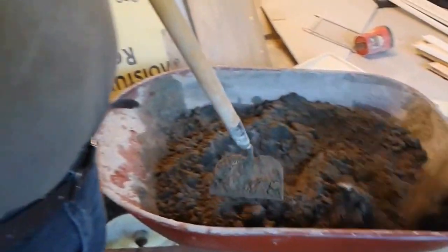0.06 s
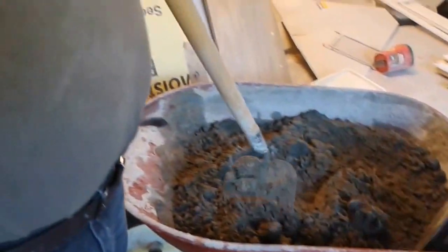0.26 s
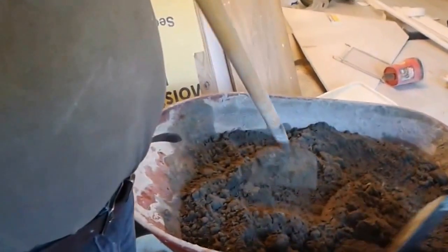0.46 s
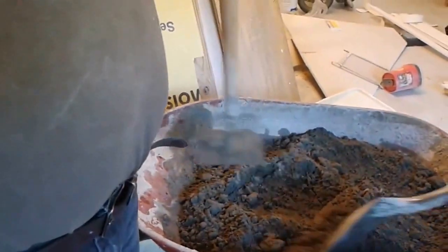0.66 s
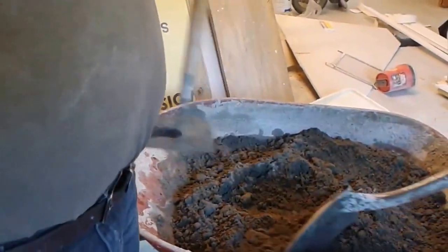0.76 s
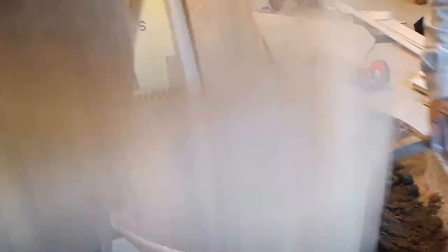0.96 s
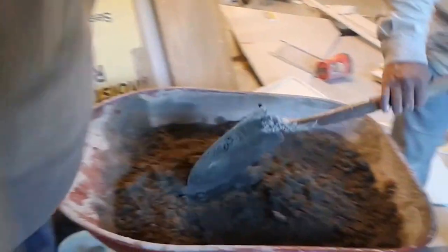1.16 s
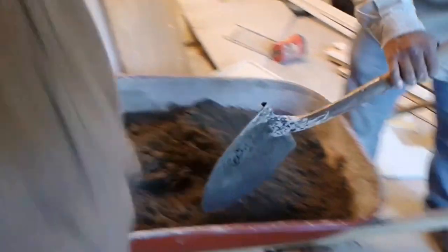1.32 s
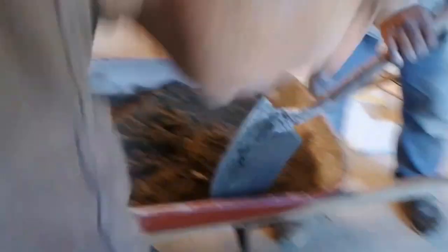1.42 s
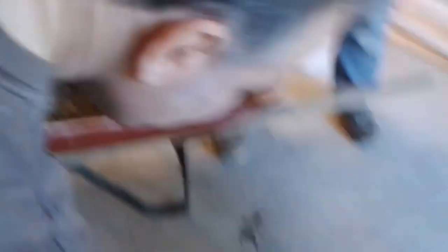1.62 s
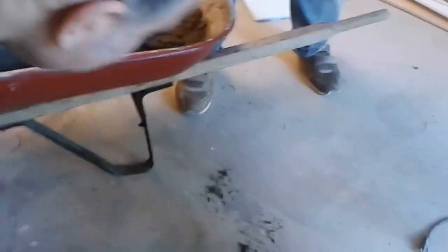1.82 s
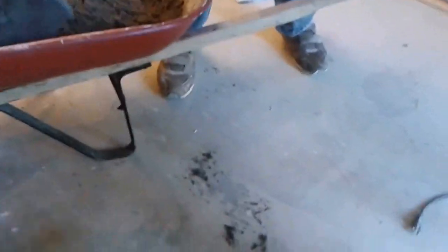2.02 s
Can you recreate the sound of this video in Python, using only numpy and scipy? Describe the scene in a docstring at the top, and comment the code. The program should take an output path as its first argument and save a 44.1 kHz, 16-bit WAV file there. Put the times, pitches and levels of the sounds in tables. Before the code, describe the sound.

A hoe crunches into damp sand and cement in a steel wheelbarrow and drags with a long gritty scrape; loose grains slide, then a shovel knocks and ploughs through. Close stereo pickup in a bare, dully echoing room.

```python
"""Mixing sand and cement in a barrow

Damp sand and cement are turned in a steel wheelbarrow in a bare concrete room, over a low rumble.
Loose mix slides before and after a hoe bites and drags; then a shovel knocks the tray and ploughs.
Grit is grainy noise that hisses and sets the decaying modes of blade and tray ringing;
knocks add short bursts and struck modes, and dull reverberation surrounds it all."""
import sys
import numpy as np
from scipy import signal
from scipy.fft import rfft, irfft, next_fast_len
from scipy.io import wavfile

SR = 44100
rng = np.random.default_rng(int(sys.argv[2]) if len(sys.argv) > 2 else 0)


def int16_out(signal):
    """Quantize to a 16-bit WAV file."""
    q = np.round(np.clip(np.atleast_2d(signal).T, -1, 1) * 32767)
    wavfile.write(sys.argv[1], SR, q.astype(np.int16))


def voltage_ratio(decibels):
    """Convert decibels (scalar or array-like) to amplitude ratios, 20 dB per decade."""
    exponent = np.asarray(decibels, float) / 20
    return 10 ** exponent


N = 91904  # length in samples


def rms_one(x):
    """Scale to unit rms."""
    return x / np.sqrt(np.mean(x ** 2) + 1e-20)


def in_time(rows):
    """Join the columns by lines over time; the first level is silent outside the table."""
    s, db, *rest = np.transpose(rows)
    t = np.arange(N) / SR
    level_db = np.interp(t, s, db, left=-150, right=-150)
    return [level_db] + [np.interp(t, s, column) for column in rest]


def at_hz(points, hz):
    """Read a table on a log-frequency axis."""
    table_hz, value = np.array(points).T
    return np.interp(np.log(hz), np.log(table_hz), value)


def drift(rate_hz):
    """Slow random wander of spread 1: noise through two equal poles, drawn at every 20th sample."""
    pole = np.exp(-40 * np.pi * rate_hz / SR)
    noise = rng.standard_normal((N + SR) // 20 + 2)
    slow = signal.lfilter([1], [1, -2 * pole, pole * pole], noise)[SR // 20:]  # skip the first second
    return np.interp(np.arange(N) / 20, np.arange(len(slow)), rms_one(slow))


def colour(pair, spectrum):
    """Shape a noise by a spectrum, then bring it to unit rms."""
    hz = np.maximum(np.arange(N // 2 + 1) * SR / N, 1)
    return rms_one(irfft(rfft(pair) * voltage_ratio(at_hz(spectrum, hz)), N))


def crunch(lumpy_db):
    """Crushed grit: two noises (middle, side) share the same random grains and slower lumps."""
    grains_per_s, grain_s = 2200, 0.0017  # grain power falls to 1/e in grain_s
    starts = rng.random(N) < grains_per_s / SR
    floor = 0.084  # some hiss stays between grains
    grain_power = signal.lfilter([1], [1, -np.exp(-1 / (grain_s * SR))], starts + floor)
    lumps = voltage_ratio(lumpy_db * (drift(39.0) + 0.5 * drift(166)))
    return rms_one(rng.standard_normal((2, N)) * np.sqrt(grain_power) * lumps)


def ring(force, modes, loaded=False):
    """A force, or a fresh one per mode, rings decaying modes; a load makes pitch and strength wander."""
    wander, swell_db, rate_hz = .01, 2.2, 6.0  # wet mix loads the steel unevenly: share of pitch, dB
    out = 0
    for k, (hz, db, t60) in enumerate(modes):
        push = force() if callable(force) else force
        bend, swell = (drift(rate_hz), drift(rate_hz)) if loaded else (np.zeros(N), 0)
        turn = np.exp(2j * np.pi * hz * np.cumsum(1 + wander * bend) / SR)
        # Shift the mode down to 0 Hz, let it decay there, and shift it back
        shifted = (push + 1e-18) * voltage_ratio(swell_db * swell) / turn
        decay = voltage_ratio(-60 / (np.clip(t60, .01, 3) * SR))
        held = signal.lfilter([1], [1, -decay], shifted)
        out = out + (-1) ** k * voltage_ratio(db) * (held * turn).imag
    return out


# Rumble spectrum. Each row: frequency in Hz, relative level in dB.
AIR_SPECTRUM = [(25, -26), (70, -9.5), (140, -6.5), (220, -13), (400, -20.5), (1400, -30), (9000, -34),
                (14500, -36.5)]
# Loudness of the rumble before its waver. Each row: time in seconds, level in dB.
AIR_LEVEL = [(0, -49.5), (1.0, -54.5), (1.75, -49.5), (1.9, -76), (2.1, -70)]


def rumble():
    """The room's rumble: bass-heavy noise with a wavering level."""
    waver_db = 2.0 * drift(25)
    level_db = in_time(AIR_LEVEL)[0] + waver_db
    return voltage_ratio(level_db) * colour(rng.standard_normal((2, N)), AIR_SPECTRUM)


# Two spells of loose mix sliding, one list each. Each row: time in seconds, level in dB.
SLIDES = [
    [(0, -47), (.12, -55), (.14, -49.5), (.3, -56.5), (.325, -43), (.34, -51)],
    [(1.0, -62), (1.04, -50), (1.048, -43), (1.07, -56.5), (1.16, -55), (1.168, -39), (1.19, -36),
     (1.225, -42.5), (1.26, -48.5), (1.37, -51.5), (1.4, -36), (1.43, -35), (1.515, -38)],
]
# Spectrum of fine sand on steel. Each row: frequency in Hz, relative level in dB.
SAND_SPECTRUM = [(150, -23), (300, -7), (1300, -10.5), (1800, -10), (2400, -6), (4200, -8), (5600, -0.5),
                 (7500, -8), (10000, -21), (14500, -28)]


def sliding_mix():
    """Fine sand slipping on steel: coloured grain noise following the two spells of sliding."""
    fine = crunch(lumpy_db=.6)
    level = sum(voltage_ratio(in_time(rows)[0]) for rows in SLIDES)
    return level * colour(fine, SAND_SPECTRUM)


def squeak():
    """A short, faint, rough whistle: noise rings one mode under a bell-shaped level."""
    middle_s, length_s, hz, peak_db = .135, .03, 3100, -56
    shape_db = peak_db - 10 * ((np.arange(N) / SR - middle_s) / length_s) ** 2
    whistle = rms_one(ring(rng.standard_normal((2, N)), [(hz, 0, .06)]))
    return voltage_ratio(np.maximum(shape_db, -200)) * whistle


def patchy(pair):
    """Grains of one size come in surges: each third of an octave swells and sinks on its own."""
    swell_db, rate_hz = 2, 6.5
    whole = rfft(pair)
    hz = np.clip(np.arange(N // 2 + 1) * SR / N, 500, 14000)
    place = 3 * np.log2(hz / 500)  # in thirds of an octave
    out = 0
    for k in range(16):
        band = irfft(whole * np.sqrt(np.clip(1 - abs(place - k), 0, 1)), N)
        out = out + voltage_ratio(swell_db * drift(rate_hz)) * band
    return rms_one(out)


def dulled(pair, grit_db):
    """Light contact is duller: the top of the hiss sinks faster than the rest."""
    treble_hz, follows = 8700, 0.35  # treble dB lost per dB under the loudest grit
    body = signal.sosfiltfilt(signal.butter(2, treble_hz, fs=SR, output="sos"), pair)
    return body + (pair - body) * voltage_ratio(follows * (grit_db - grit_db.max()))


def rubbed(level_db, modes):
    """Steel driven by rubbing grit: its loaded modes, scaled by the power they would gather."""
    force = crunch(lumpy_db=3.5)
    power = sum(voltage_ratio(2 * db) * t60 * SR / (4 * np.log(1000)) for hz, db, t60 in modes)
    return ring(force * voltage_ratio(level_db), modes, loaded=True) / np.sqrt(power)


# Modes of the steel tray. Each row: frequency in Hz, relative strength in dB, 60 dB decay in seconds.
TRAY = [(112, -12, .08), (139, -7, .1), (169, 0, .12), (197, -5, .1), (240, -10, .06), (436, -5, .03)]


def knocks(rows, blade, crushed):
    """Each knock: a burst of crushed grit, struck blade modes of uneven strength, a push on the tray."""
    s, crack_db, ring_db, boom_db = np.transpose(rows)

    def clicks(level_db, spread_db):
        """One-sample pushes at the knock times, with fresh strengths for middle and side."""
        train = np.zeros((2, N))
        uneven_db = spread_db * rng.standard_normal((len(s), 2)).T
        train[:, (s * SR).astype(int)] = voltage_ratio(level_db + uneven_db)
        return train

    # The burst rises in about 1 ms and dies away with a 5 ms time constant
    fall, rise = np.exp(-1 / (.005 * SR)), np.exp(-1 / (.001 * SR))
    dying = signal.lfilter([1], [1, -fall], clicks(crack_db, 0)[0])
    envelope = signal.lfilter([1 - rise], [1, -rise], dying)
    burst = envelope * colour(rng.standard_normal((2, N)), crushed)

    b, a = signal.butter(1, 2000, fs=SR)  # softens the struck blade above 2 kHz
    clang = signal.lfilter(b, a, ring(lambda: clicks(ring_db, 2.5), blade))
    boom = ring(clicks(boom_db, 0), TRAY)
    return burst + clang + boom


# Spectrum of the crushed grit. Each row: frequency in Hz, relative level in dB.
GRIT_SPECTRUM = [(150, -25.5), (300, 0.5), (600, 0.5), (1300, -1), (2500, 1.5), (4000, -1), (5500, 3.5),
                 (7000, 1), (9500, -9), (12000, -11.5), (14500, -3.5)]


def stroke(rows, knock_rows, blade, crushed):
    """A blade ploughing through the mix: grit hiss, low and high blade ring, tray boom, knocks."""
    split_hz, blade_trim_db, boom_trim_db = 820, -5.5, -1.5
    grit_db, low_db, high_db, boom_db = in_time(rows)
    low_modes = [mode for mode in blade if mode[0] < split_hz]
    high_modes = [mode for mode in blade if mode[0] >= split_hz]

    grit = patchy(colour(crunch(lumpy_db=0.35), GRIT_SPECTRUM))
    hiss = voltage_ratio(grit_db) * dulled(grit, grit_db)
    low_ring = rubbed(grit_db + low_db + blade_trim_db, low_modes)
    high_ring = rubbed(grit_db + high_db + blade_trim_db, high_modes)
    boom = rubbed(grit_db + boom_db + boom_trim_db, TRAY)
    return hiss + low_ring + high_ring + boom + knocks(knock_rows, blade, crushed)


# The hoe bites and drags. Each row: time in seconds, grit level in dB, then low blade ring,
# high blade ring and tray boom in dB relative to the grit, before the trims in stroke().
HOE_STROKE = [(.339, -41, -10, -10, 1), (.343, -25.5, -4, -38, -27), (.356, -19, -9, 2.5, -23),
              (.385, -25, -11, -19, -2.5), (.433, -18.5, -36, -21, -6.5), (.485, -21.5, -14, -5.5, -7),
              (.6, -24, -12.5, -3.5, -7), (.68, -22.5, -6, -4, -8), (.75, -22, -8, -3, -14),
              (.83, -27, -2.5, 2, -18), (.88, -33, -3, -8, -18), (1.0, -47.5, -5, -2, -19)]
# The hoe meets steel or a lump. Each row: time in seconds, then the strength in dB of
# the grit burst, the push on the blade and the push on the tray.
HOE_KNOCKS = [(.342, -14.5, -50, -19), (.358, -20, -45, -10), (0.369, -15, -56, -40),
              (0.386, -24, -41, -20), (0.395, -13.5, -57, -47), (.426, -12, -62, -54)]
# Modes of the hoe. Each row: frequency in Hz, relative strength in dB, 60 dB decay in seconds.
HOE_BLADE = [(380, -3, 0.059), (478, -4.5, 0.075), (541, -5.5, 0.095), (604, -7, 0.28), (737, -2, 0.13),
             (799, -5.5, 0.065), (967, 5.5, 0.02), (1152, -0.5, 0.042), (1507, 3, 0.037),
             (1690, -2.5, 0.045), (1865, 1, 0.034), (2993, 4, 0.025)]


def hoe():
    """The hoe's blade is driven by grit as it bites and drags, and by its knocks."""
    return stroke(HOE_STROKE, HOE_KNOCKS, HOE_BLADE, crushed=GRIT_SPECTRUM)


# The shovel touches, rests and ploughs. Each row: time in seconds, grit level in dB, then low blade
# ring, high blade ring and tray boom in dB relative to the grit, before the trims in stroke().
SHOVEL_STROKE = [(1.508, -32.5, -5, 19, 2.5), (1.52, -34, -4, 2, -20), (1.545, -35.5, -6, 4.5, -2),
                 (1.64, -41, -25, -12, -2), (1.647, -20, 1.5, -4, -4), (1.685, -25, 4, -11, -11.5),
                 (1.73, -20.5, -1.5, 3, -5.5), (1.742, -15.5, -0.5, -4.5, -11.5),
                 (1.785, -13, -8, -2.5, -25), (1.8, -18, -22, -2.5, -33), (1.9, -16, -64, -12, -32),
                 (1.957, -16, -32, -17, -38), (2.057, -20.5, -3.5, -14, -35), (2.084, -30.5, 3, -21, -41)]
# The shovel meets steel or a lump. Each row: time in seconds, then the strength in dB of
# the grit burst, the push on the blade and the push on the tray.
SHOVEL_KNOCKS = [(1.511, -23, -28.5, -44), (1.644, -16, -20, -25)]
# Modes of the shovel. Each row: frequency in Hz, relative strength in dB, 60 dB decay in seconds.
SHOVEL_BLADE = [(331, -1, 0.04), (435, -2, 0.1), (509.5, 4.5, 0.054), (632, -1.5, 0.031),
                (843, -6.5, 0.041), (1005, -6.5, 0.059), (1160, -3.5, 0.035), (1519, -6, 0.075),
                (1846, -8, 0.027)]


def shovel():
    """The shovel's blade is driven by grit as it ploughs; its knocks crush finer sand."""
    return stroke(SHOVEL_STROKE, SHOVEL_KNOCKS, SHOVEL_BLADE, crushed=SAND_SPECTRUM)


def room(x):
    """Dense dull reverberation of bare walls: convolution with decaying low-passed noise."""
    t60_s, level_db, cut_hz = 0.64, -14, 2780
    t = np.arange(SR) / SR
    tail = rng.standard_normal((2, SR)) * voltage_ratio(-60 * t / t60_s) * (t > .008)  # starts after 8 ms
    tail = signal.lfilter(*signal.butter(1, cut_hz, fs=SR), tail)
    tail = tail / np.sqrt(np.sum(tail ** 2) / 2)
    return voltage_ratio(level_db) * signal.fftconvolve(x, tail, axes=1)[:, :N]


# How alike left and right are. Each row: frequency in Hz, correlation from 0 to 1.
LIKENESS = [(60, 0.68), (130, 0.99), (290, 0.85), (640, 0.74), (1410, 0.24), (3100, 0), (6820, 0)]
# Stereo tilt before each source's pan. Each row: frequency in Hz, left over right in dB.
LEFT_LOUDER = [(60, -1.5), (500, 1), (1000, 1.5), (2000, 5), (3500, 7.5), (5500, 7.5), (7000, -2.5),
               (9000, -9), (11500, -8), (14000, 1)]


def spread(pair, pan_db, lag_s):
    """Middle and side become left and right: alike in the bass, unrelated in the treble."""
    size = next_fast_len(N + SR // 4)
    mid, side = rfft(pair, size)
    hz = np.maximum(np.arange(len(mid)) * SR / size, 1)
    alike = np.clip(at_hz(LIKENESS, hz), 0, .99)
    side = side * np.sqrt((1 - alike) / (1 + alike))
    # Half the level difference and half the lag of the left go to each ear
    tilt = voltage_ratio((at_hz(LEFT_LOUDER, hz) + pan_db) / 2) * np.exp(-1j * np.pi * hz * lag_s)
    return irfft(np.array([(mid + side) * tilt, (mid - side) / tilt]), size)[:, :N]


def scene():
    """Both tools, the sliding mix and the squeak in the room, over its rumble."""
    air = rumble()
    sand = sliding_mix() + squeak()
    hoe_sound = hoe()
    shovel_sound = shovel()
    barrow = spread(sand + room(sand), pan_db=-1.5, lag_s=0)
    barrow = barrow + spread(hoe_sound + room(hoe_sound), pan_db=0, lag_s=0.00012)
    barrow = barrow + spread(shovel_sound + room(shovel_sound), pan_db=-1.5, lag_s=-0.000029)
    # The microphone's high-pass thins the deep bass of the barrow sounds
    barrow = signal.sosfilt(signal.butter(4, 90, "high", fs=SR, output="sos"), barrow)
    return barrow + spread(air, 0, 0)


def band_limit(x):
    """A steep low-pass at the top of the band."""
    return signal.sosfilt(signal.butter(12, 15850, fs=SR, output="sos"), x)


def record(dry):
    """Peaks are rounded off softly, then the extreme top is cut steeply."""
    ceiling, cutoff_hz = 1.1, 14380
    rounded = ceiling * np.tanh(dry / ceiling)
    top_cut = signal.ellip(10, .3, 70, cutoff_hz, fs=SR, output="sos")
    mix = signal.sosfilt(top_cut, rounded)
    return band_limit(mix)


dry = scene()
out = record(dry)
int16_out(out)
```